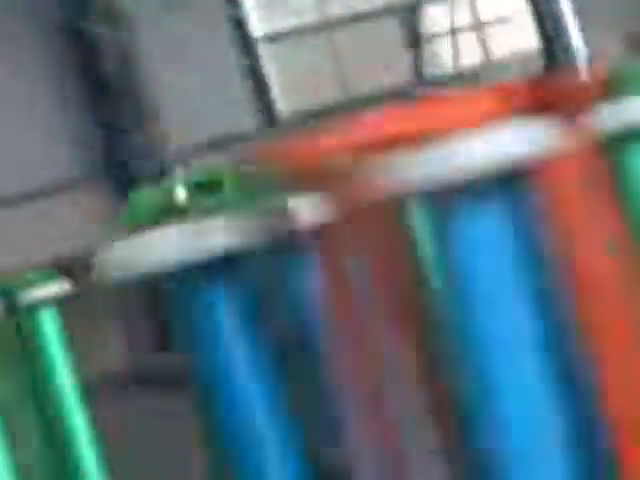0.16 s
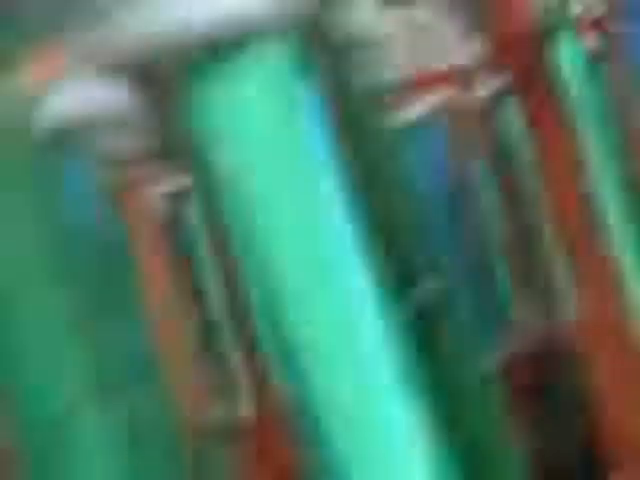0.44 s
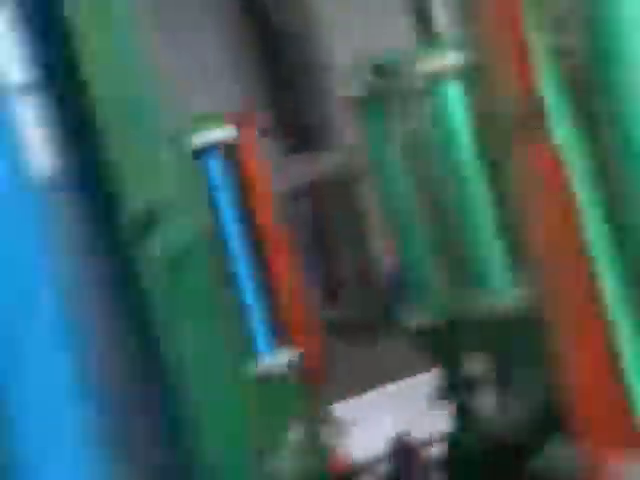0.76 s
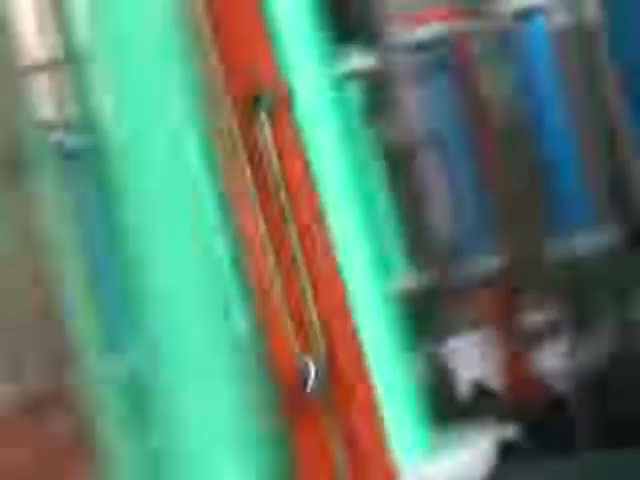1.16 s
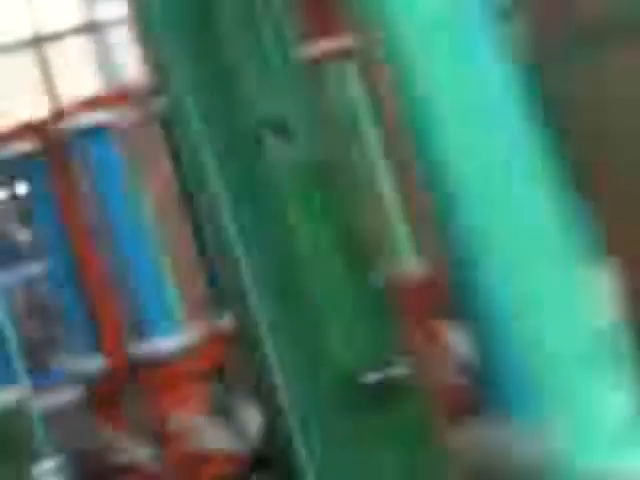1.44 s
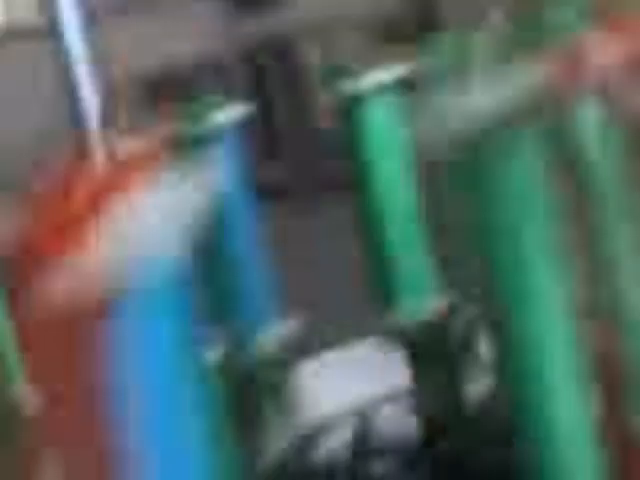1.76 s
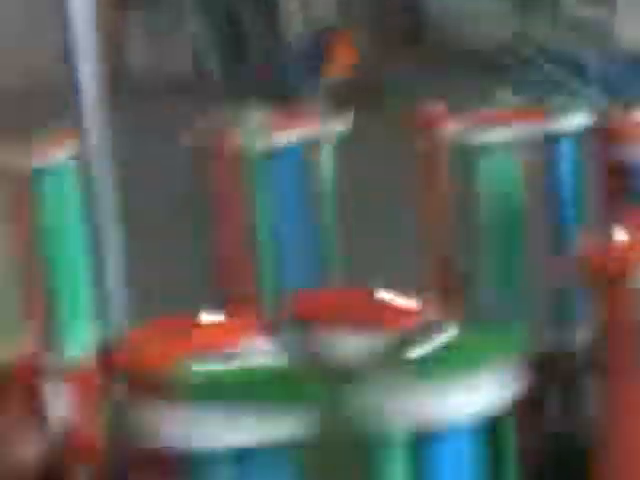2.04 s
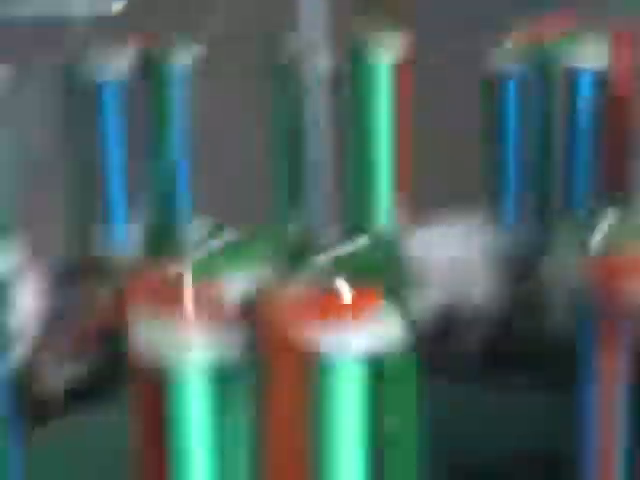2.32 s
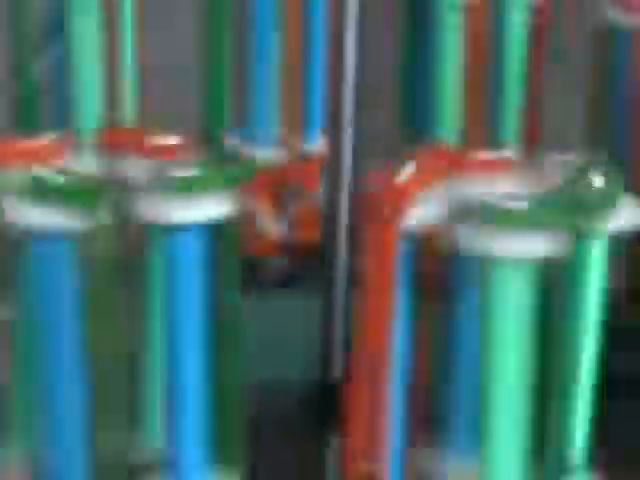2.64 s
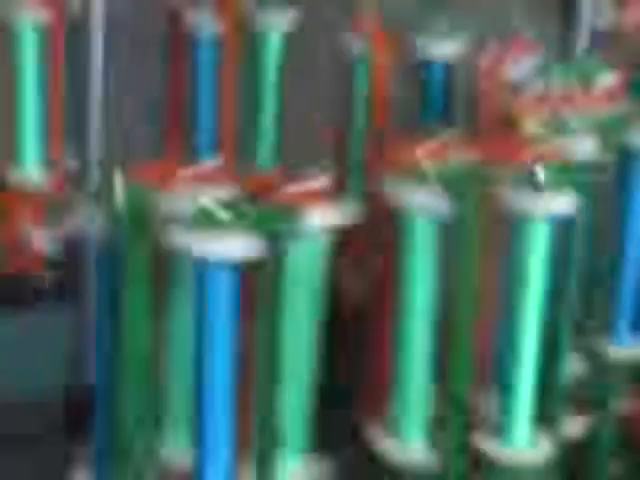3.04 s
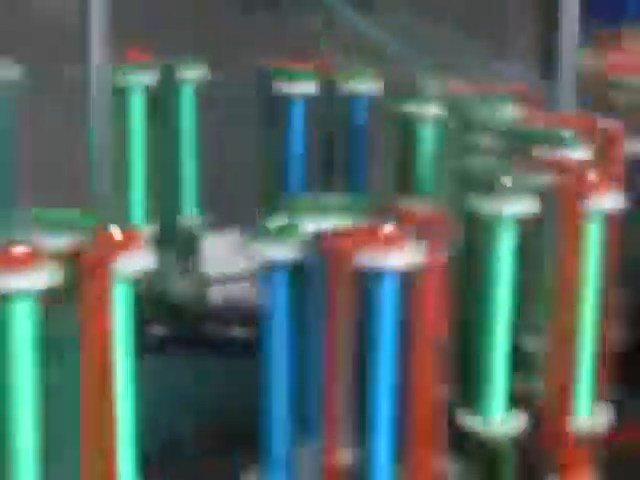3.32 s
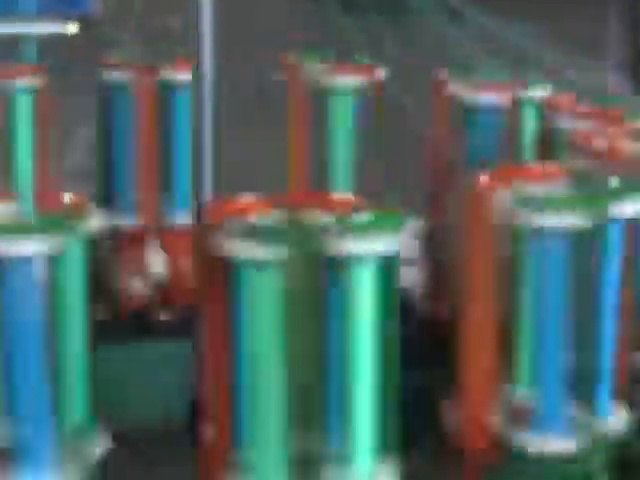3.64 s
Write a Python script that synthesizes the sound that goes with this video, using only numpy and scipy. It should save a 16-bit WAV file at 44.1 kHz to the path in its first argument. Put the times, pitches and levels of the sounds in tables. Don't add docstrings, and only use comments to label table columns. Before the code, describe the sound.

A braiding machine roars steadily up close, with dense metallic clatter, dull knocks and steel clinks.

```python
import sys
import numpy as np
from scipy import signal
from scipy.fft import rfft, irfft, next_fast_len
from scipy.io import wavfile
from scipy.ndimage import uniform_filter1d

SR = 44100
rng = np.random.default_rng(int(sys.argv[2]) if len(sys.argv) > 2 else 0)


def undo_db(level):
    steps = np.asarray(level, float) / 20
    return 10 ** steps


def wav_out(sig):
    wavfile.write(sys.argv[1], SR, np.round(np.clip(np.atleast_2d(sig).T, -1, 1) * 32767).astype(np.int16))


N = 166698
CYCLE_HZ = 7.58


def evened(x):
    return x / np.sqrt(np.mean(x ** 2) + 1e-20)


def read(points, hz):
    f, value = np.transpose(points)
    return np.interp(np.log(hz + 1), np.log(f + 1), value)


def camera(curve):
    # (time [s], whine [dB], pan L-R [dB], closeness to the bed [dB],
    # facing the nearest horn gear [dB])
    motion = [
        (0, -30, 0, 6, 5),
        (.5, -32, 0, 0.5, 1.5),
        (1.1, -33.5, -0.5, 5.5, -0.5),
        (1.7, -30.5, 0, 2, 1.5),
        (2.15, -35.5, 0.5, 4, -1),
        (2.6, -30, 0.5, 1, 3.5),
        (2.75, -37.5, 1, 0, -1),
        (3.3, -35.5, 1, 2, 4),
        (3.78, -33.5, 1.2, 1, 0.5),
    ]
    table = np.array(motion, float)
    column = ("time", "whine", "pan", "closeness", "facing").index(curve)
    return np.interp(np.arange(N) / SR, table[:, 0], table[:, column])


def ring(x, hz, width):
    radius, angle = np.exp(-np.pi * abs(width) / SR), 2 * np.pi * hz / SR
    return signal.lfilter([.5, 0, -.5], [1, -2 * radius * np.cos(angle), radius * radius], x)


def body(pitches, modes, drive):
    total = 0
    for hz, (width, db) in zip(pitches, modes):
        total = total + undo_db(db) * np.sqrt(abs(width)) * ring(drive(), hz, width)
    return evened(total)


def force(times, levels_db, blur_s):
    train = np.zeros(N)
    at = np.round(np.asarray(times) * SR).astype(int)
    keep = (at >= 0) & (at < N)
    np.add.at(train, at[keep], undo_db(np.asarray(levels_db))[keep])
    t = np.arange(1500) / SR
    shape = np.minimum(t / 0.0027, 1) * np.exp(-t / blur_s)
    return abs(signal.oaconvolve(train, shape / np.linalg.norm(shape))[:N])


def beat(pattern, blur_s):
    jitter_s, spread_db = .004, 2.2
    place, db = np.transpose(pattern)
    chance = rng.standard_normal((30, len(place), 2))
    times = (np.arange(-1, 29)[:, None] + place) / CYCLE_HZ + jitter_s * chance[..., 0]
    levels_db = db + spread_db * chance[..., 1]
    return force(times.ravel(), levels_db.ravel(), blur_s)


def rattle():
    clicks_per_s, spread_db = 500, 3
    draw = rng.random((N, 3))
    hit = draw[:, 0] < clicks_per_s / SR
    strength = undo_db(-spread_db * np.log(draw[:, 2] + 0.0026))
    return evened(hit * np.sign(draw[:, 1] - .5) * strength)


def strikes(hits, pitches, modes, rise_s, blur_s):
    reach_oct, detune, bounce_edge = .45, .005, 2.5
    t, out = np.arange(4000) / SR, np.zeros(N)
    shape = np.minimum(t / rise_s, 1) * np.exp(-t / blur_s)
    for s, peak_db, *spot_hz in hits:
        jolts = rng.standard_normal((len(modes), len(t)))
        chatter = shape * jolts * (abs(jolts) > bounce_edge)
        centre_hz = spot_hz[0] if spot_hz else pitches[0]
        near = np.exp(-.5 * (np.log2(np.array(pitches) / centre_hz) / reach_oct) ** 2)
        tune = 1 + detune * rng.standard_normal()
        sound = 0
        for gain, drive, hz, (width, db) in zip(near, chatter, pitches, modes):
            sound = sound + gain * undo_db(db) * np.sqrt(abs(width)) * ring(drive, hz * tune, width)
        part = out[int(s * SR):][:len(t)]
        part += (undo_db(peak_db) * sound / abs(sound).max())[:len(part)]
    return out


def workshop(x):
    common_db, wide_db, t60_s = -15, -15.5, .1
    t = np.arange(12000) / SR
    present = rng.random((3, len(t))) < .05
    taps = rng.choice([-1., 1.], (3, len(t))) * present * undo_db(-60 * t / t60_s)
    taps = taps / np.linalg.norm(taps, axis=1, keepdims=True)
    echoes = undo_db(common_db) * taps[:1] + undo_db(wide_db) * taps[1:]
    return signal.fftconvolve(x[None], echoes, axes=1)[:, :N]


def roar():
    # (frequency [Hz], density [dB per Hz])
    spectrum = [(30, -4), (120, -22), (300, -16), (500, -8.5), (1400, -2), (1600, -5.5), (4600, -7),
                (10800, -11)]
    # (frequency [Hz], likeness [0-1])
    coherence = [(60, 1), (220, 0.95), (810, 0.86), (3000, 0.84), (11100, 0.92)]
    roar_db, patch_db, flicker_db, swell_db = -18.5, 1.3, 2.8, 0.04
    low_beat_db, low_beat_at, low_edge_hz = 2, 0.84, 850
    high_beat_db, high_beat_at = 0.5, 0.1
    frames, hz = N // 128 + 5, np.fft.rfftfreq(512, 1 / SR)
    a, b, c, d, patches, flicker = rng.standard_normal((frames, 257, 6)).T
    patches = evened(uniform_filter1d(uniform_filter1d(patches, size=6, axis=0), size=16, axis=1))
    flicker = evened(uniform_filter1d(uniform_filter1d(flicker, size=60, axis=0), size=3, axis=1))

    t = np.arange(frames) * 128 / SR
    swell = evened(sum(np.sin(2 * np.pi * (f * t + rng.random())) / np.sqrt(f)
                       for f in np.geomspace(.5, 8, num=20)))
    low = 1 / (1 + (hz[:, None] / low_edge_hz) ** 4)
    low_pulse = low_beat_db * np.cos(2 * np.pi * (CYCLE_HZ * t - low_beat_at))
    high_pulse = high_beat_db * np.cos(2 * np.pi * (CYCLE_HZ * t - high_beat_at))
    pulse = low * low_pulse + (1 - low) * high_pulse

    same = np.clip(read(coherence, hz), -1, 1)[:, None]
    left = a + 1j * b
    right = same * left + np.sqrt(1 - same ** 2) * (c + 1j * d)
    level_db = patch_db * patches + flicker_db * flicker + swell_db * swell + pulse
    x = signal.istft(np.array([left, right]) * undo_db(level_db), nperseg=512, noverlap=384)[1][:, :N]
    colour = undo_db(read(spectrum, np.fft.rfftfreq(N, 1 / SR)))
    return undo_db(roar_db) * evened(irfft(rfft(x) * colour, N))


def wavering(hz, width):
    noise = ring(ring(rng.standard_normal(N), hz, width), hz, 4 * width)
    line = signal.hilbert(evened(noise), next_fast_len(N))[:N]
    return evened((line / (abs(line) + .05) ** .3).real)


def whine():
    line_hz = [9767, 9802, 9885, 9935, 9962, 9998, 10034, 10070, 10190]
    # (width [Hz], level [dB rms])
    lines = [(22, -47), (12, -36), (30, -58), (30, -41), (12, -34.5), (14, -34.5), (14, -41), (40, -74),
             (16, -41.5)]
    direct = sum(undo_db(db) * wavering(hz, width) for hz, (width, db) in zip(line_hz, lines))
    scattered = np.roll(direct, N // 2)
    both = direct + undo_db(-14.5) * np.array([[1], [-1]]) * scattered
    return both * undo_db(camera("whine") + 34.5)


def ticks():
    # (time [s], peak level [dB])
    latch_ticks = [(0.27, -19), (0.7901, -28), (0.8345, -19.5), (1.115, -26), (1.3264, -26), (1.4411, -26),
                   (1.6646, -21), (2.1176, -37), (2.4197, -21), (3.0889, -23), (3.4481, -33), (3.5399, -32),
                   (3.7314, -25)]
    tick_db, patter_db, t60_s = 34, -29, .08
    s, db = np.transpose(latch_ticks)
    patter_force = signal.oaconvolve(abs(rattle()), np.exp(-np.arange(300) / 60))[:N]
    patter = evened(patter_force * rng.standard_normal(N))
    latches = force(s, db + tick_db, t60_s / np.log(1000)) * rng.standard_normal(N)
    band = signal.butter(2, [4400, 9800], "band", fs=SR, output="sos")
    return signal.sosfilt(band, latches + undo_db(patter_db) * patter)


def steel():
    steel_hz = [1950, 1990, 2095, 2410, 2660, 2735, 2880, 3820, 4220, 5250]
    # (width [Hz], level [dB])
    steel_modes = [(26, -1), (46.7, -10), (10.9, -9), (74, -5.5), (79.5, -11), (41, -9), (50, -39),
                   (59.6, 1.5), (60.6, -3), (244, -3)]
    # (place [0-1 cycle], level [dB])
    clink_beat = [
        (.13, 2),
        (.19, 13),
        (.31, 3),
        (.43, 0),
        (.62, 1),
        (.82, 7),
    ]
    # (time [s], peak level [dB])
    low_clinks = [(0.0232, -12), (0.159, -18), (0.188, -16), (0.3157, -10), (0.3701, -17), (0.4176, -9.5),
                  (0.5462, -22), (0.8345, -28), (0.9562, -16), (1.0789, -29), (1.1083, -13.5), (1.28, -20),
                  (1.4553, -11), (1.6023, -14), (1.8576, -13), (1.9155, -13), (1.9957, -14),
                  (2.0722, -12.5), (2.1314, -12), (2.167, -13), (2.2677, -13), (2.3803, -7.5),
                  (2.4817, -14), (2.5067, -12), (2.5305, -17), (2.614, -23), (2.664, -28), (2.7397, -26),
                  (2.8, -10), (2.8983, -9.5), (2.9594, -17), (3.018, -28), (3.0826, -15), (3.143, -12.5),
                  (3.1981, -15), (3.3074, -26), (3.4126, -21), (3.4456, -22), (3.4855, -13), (3.5104, -15),
                  (3.541, -17), (3.5775, -6.5), (3.619, -22), (3.6565, -21), (3.7537, -23)]
    # (time [s], peak level [dB])
    high_clinks = [(0.0174, -9), (0.1092, -23), (0.2838, -11), (0.3127, -26), (0.409, -10), (0.5043, -23),
                   (0.5521, -9.5), (0.6799, -19), (0.8729, -21), (0.8989, -22), (0.9393, -9.5),
                   (1.0735, -12), (1.1034, -14), (1.1902, -12), (1.2895, -19), (1.3314, -20), (1.4731, -17),
                   (1.5075, -13), (1.5983, -8), (1.7394, -7.5), (1.8597, -9.5), (1.9001, -14.5),
                   (1.9999, -7), (2.0368, -9), (2.0951, -19), (2.1355, -11), (2.2737, -7), (2.3436, -19),
                   (2.38, -8.5), (2.5207, -9), (2.5631, -26), (2.6165, -15), (2.6688, -9), (2.6978, -19),
                   (2.7257, -16), (2.7926, -10), (2.8799, -11), (2.9342, -12), (2.9642, -31), (3.0624, -18),
                   (3.1946, -10), (3.2445, -25), (3.2954, -26), (3.3218, -12), (3.3862, -22), (3.4171, -21),
                   (3.4376, -19), (3.4984, -17), (3.5813, -11), (3.7229, -19)]
    # (time [s], peak level [dB])
    cap_clinks = [(0.3711, -29), (0.5287, -27), (0.5716, -20), (0.636, -14), (0.6873, -11.5), (1.064, -21),
                  (1.1528, -25), (1.339, -25), (1.3803, -27), (1.477, -24), (1.6292, -15), (1.7534, -26),
                  (1.9584, -19), (2.0348, -22), (2.0757, -31), (2.1316, -22), (2.2258, -19), (2.2967, -13),
                  (2.389, -14), (2.4862, -28), (2.5391, -14), (2.6075, -22), (3.5917, -22), (3.7334, -15)]
    # (time [s], peak level [dB])
    guide_clinks = [(0.4988, -22), (0.9338, -24), (1.0635, -17), (1.1992, -16), (1.5938, -20),
                    (2.1236, -24), (2.2513, -22), (2.5227, -20), (2.659, -13), (2.7871, -23), (2.9921, -19),
                    (3.0744, -20), (3.1847, -19), (3.243, -25), (3.3353, -14), (3.6082, -20), (3.7075, -20)]
    clink_db, rattle_db, gear_db, closeness_lean = -33, -26, -3.5, -0.075
    pitches, modes = np.array(steel_hz), np.array(steel_modes)
    gear = np.isin(np.arange(len(modes)), (4, 5))
    out = 0
    for rows, db in ((gear, gear_db + camera("facing")), (~gear, closeness_lean * camera("closeness"))):
        handover = beat(clink_beat, 0.0051)
        clinks = body(pitches[rows], modes[rows], lambda: handover * rng.standard_normal(N))
        loose = body(pitches[rows], modes[rows], rattle)
        out = out + undo_db(db) * (undo_db(clink_db) * clinks + undo_db(rattle_db) * loose)
    # (hits, level [dB], mode row)
    parts = ((low_clinks, -3, 5), (high_clinks, -3.5, 7), (cap_clinks, -6.5, 8), (guide_clinks, 4, 9))
    for hits, db, row in parts:
        out = out + undo_db(db) * strikes(hits, [steel_hz[row]], [steel_modes[row]], rise_s=.0026, blur_s=.02)
    return out


def bed():
    bed_hz = [145, 270, 344, 427, 520, 640, 730, 850, 1000, 1200, 1320, 1440]
    # (width [Hz], level [dB])
    bed_modes = [(20, -21), (40, -10.5), (18.1, -5.5), (16.9, -0.5), (35.3, 0.5), (73.5, 4), (43, 3.5),
                 (53, 2.5), (58, 4), (68.5, 2.5), (42.3, 3), (60, -11.5)]
    # (place [0-1 cycle], level [dB])
    knock_beat = [
        (.65, 0),
        (.83, 0),
        (.02, -2.5),
        (.24, -8),
        (.44, -9),
    ]
    # (time [s], peak level [dB], pitch of the struck spot [Hz])
    hard_knocks = [(0.085, -10, 729), (0.138, -12, 655), (0.224, -13.5, 501), (0.299, -16, 1020),
                   (0.353, -5.5, 573), (0.43, -9, 1290), (0.488, -11.5, 560), (0.617, -9, 654),
                   (0.666, -14.5, 1200), (0.72, -12, 1320), (0.861, -26, 1230), (0.913, -24, 584),
                   (1.005, -13, 720), (1.087, -12.5, 985), (1.144, -24, 754), (1.315, -15, 705),
                   (1.347, -12.5, 656), (1.391, -9, 720), (1.43, -15, 654), (1.544, -9.5, 988),
                   (1.783, -10, 861), (1.882, -18, 1140), (1.939, -9, 750), (2.012, -17.5, 1010),
                   (2.09, -11, 537), (2.144, -15, 990), (2.181, -11, 867), (2.253, -14, 969),
                   (2.328, -14, 1000), (2.46, -12, 830), (2.582, -12, 1270), (2.619, -11.5, 1340),
                   (2.756, -9.5, 980), (2.84, -12.5, 890), (2.942, -15, 1020), (2.984, -15, 802),
                   (3.123, -14, 1240), (3.224, -13, 730), (3.256, -8.5, 977), (3.36, -26, 719),
                   (3.392, -14, 918), (3.461, -23, 1030), (3.516, -10, 1070), (3.638, -9, 1000),
                   (3.76, -31, 1300)]
    knock_db, rattle_db, hard_db = -34, -29.5, -4
    swell_db, swell_at = 0.5, 0.84
    hard = strikes(hard_knocks, bed_hz[3:11], bed_modes[3:11], rise_s=.0037, blur_s=.025)
    handover = beat(knock_beat, 0.0059)
    swell = undo_db(swell_db * np.cos(2 * np.pi * (CYCLE_HZ * np.arange(N) / SR - swell_at)))
    knocks = body(bed_hz, bed_modes, lambda: handover * rng.standard_normal(N))
    loose = body(bed_hz, bed_modes, lambda: swell * rattle())
    regular = undo_db(knock_db) * knocks + undo_db(rattle_db) * loose
    return regular * undo_db(camera("closeness")) + undo_db(hard_db) * hard


def scene():
    near = bed() + steel() + ticks()
    return near + workshop(near) + roar() + whine()


def port_balance(x):
    # (frequency [Hz], L-R [dB])
    tilt = [(300, 0.5), (610, 0), (1090, -1.5), (1940, -1.5), (4000, -0.2), (10000, -1.3)]
    side, hz = np.array([[.5], [-.5]]), np.fft.rfftfreq(N, 1 / SR)
    x = irfft(rfft(x) * undo_db(side * read(tilt, hz)), N)
    pan = camera("pan")
    return x * undo_db(side * (pan - pan.mean()))


def gain_control(x):
    target_db, share, window_s = -13.5, 0.27, 0.014
    power = uniform_filter1d((x ** 2).mean(0), int(window_s * SR))
    power_db = 10 * np.log10(abs(power) + 1e-12)
    return x / undo_db(share * (power_db - target_db))


def overload(x):
    ceiling, lopsided = .75, 0.07
    return ceiling * np.tanh(x / ceiling) + lopsided * (x ** 2 - (x ** 2).mean())


def band_limit(x):
    spill_s = [.52, .61, .76, .93, .98, 1.21, 1.33, 1.39, 1.59, 2.12, 2.4, 2.52, 2.64, 2.94, 3.09, 3.25,
               3.44, 3.52, 3.62]
    edge_hz, spill_hz, spill_db, spill_length_s = 11030, 11290, -7, .016
    z, hz, t = rfft(x), np.fft.rfftfreq(N, 1 / SR), np.arange(N) / SR
    gate = sum(np.exp(-((t - s) / spill_length_s) ** 4) for s in spill_s)
    top = irfft(z.mean(0) * (hz >= edge_hz) * (hz < spill_hz), N) * gate
    return irfft(z * (hz < edge_hz), N) + undo_db(spill_db) * top


def top_cut(x):
    return signal.sosfilt(signal.butter(12, 11660, fs=SR, output="sos"), x)


def record(dry):
    x = gain_control(port_balance(dry))
    x = signal.sosfilt(signal.butter(2, 143, "high", fs=SR, output="sos"), x)
    mix = band_limit(overload(x))
    return top_cut(mix)


dry = scene()
out = record(dry)
wav_out(out)
```